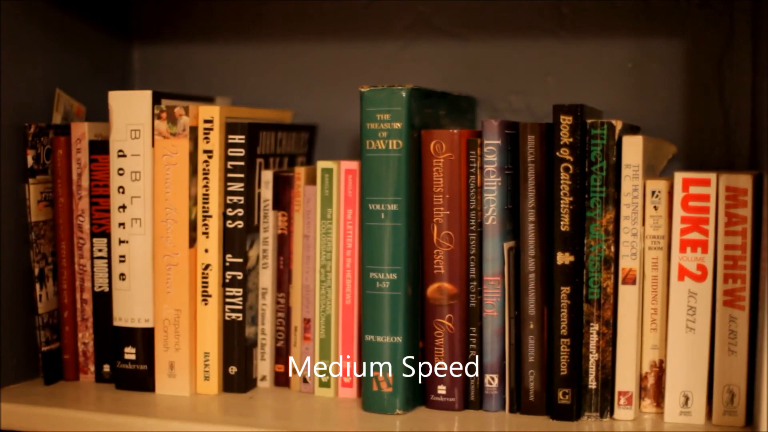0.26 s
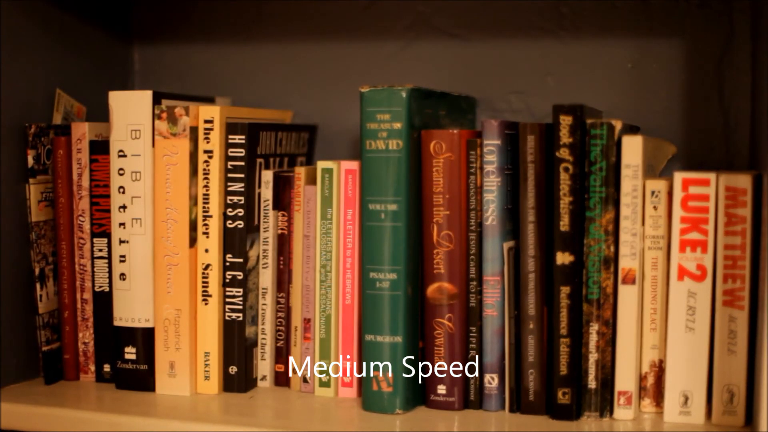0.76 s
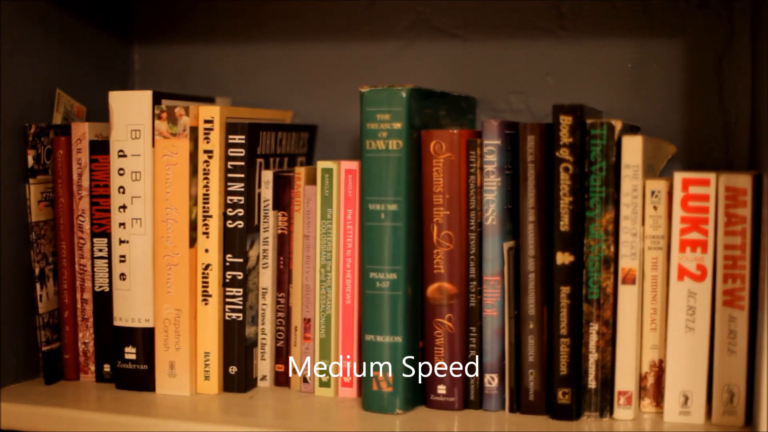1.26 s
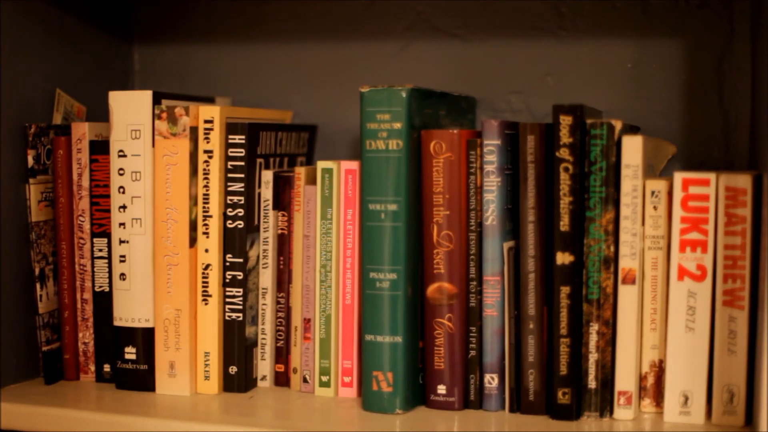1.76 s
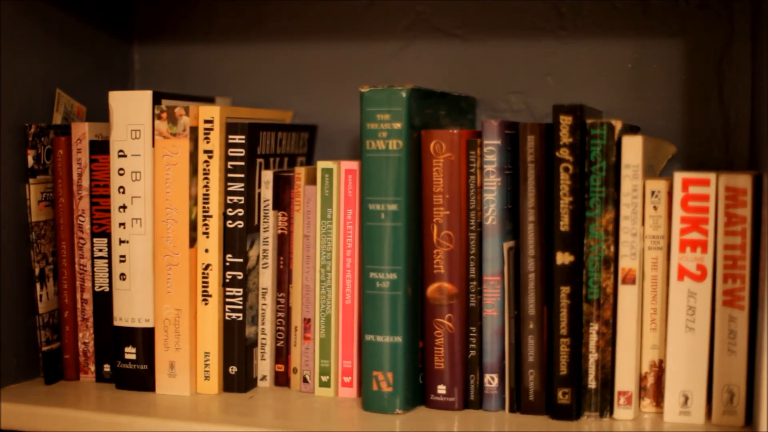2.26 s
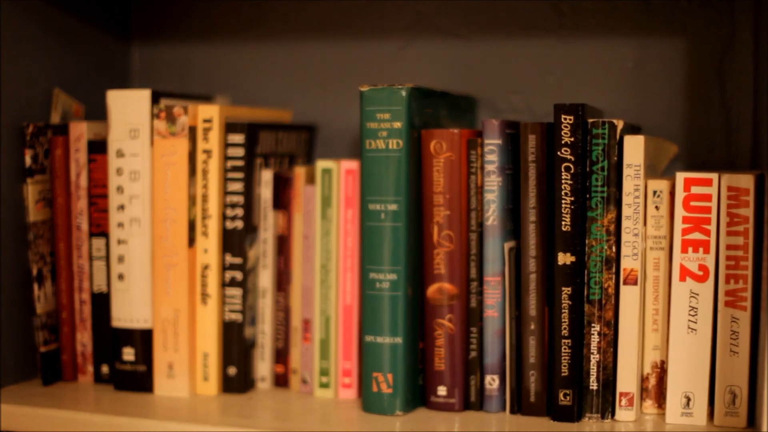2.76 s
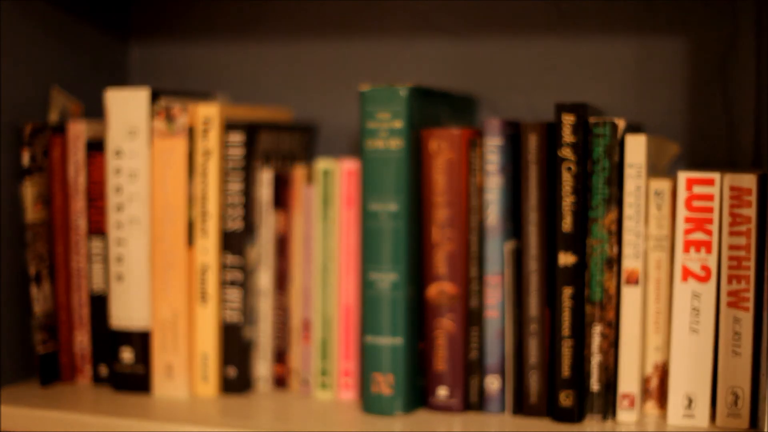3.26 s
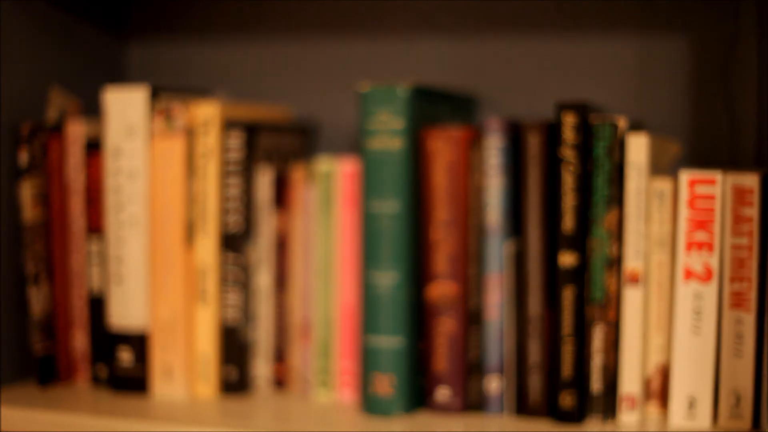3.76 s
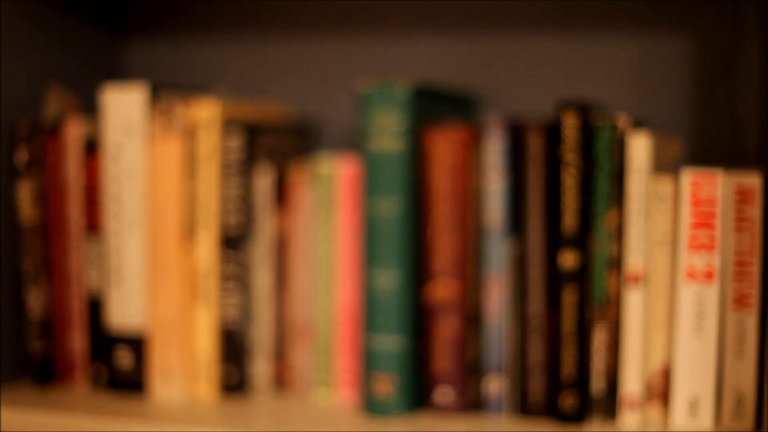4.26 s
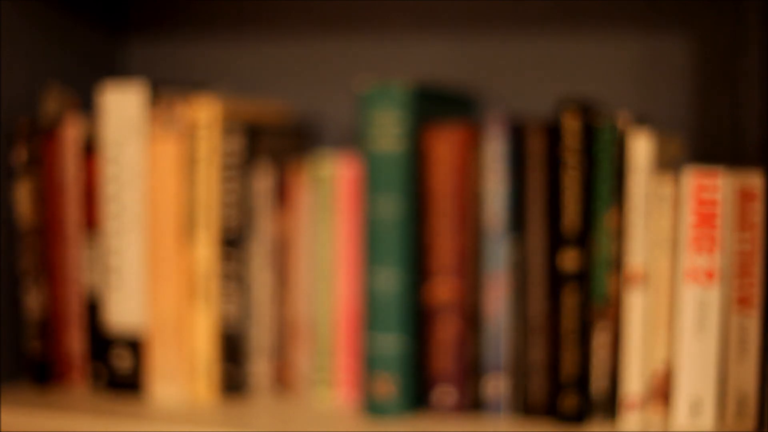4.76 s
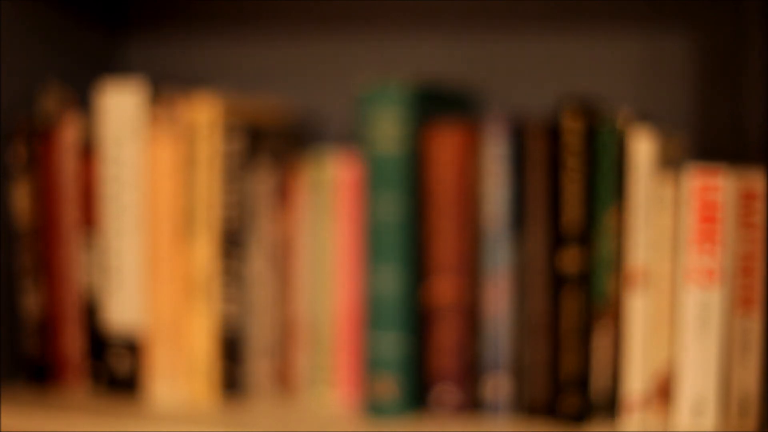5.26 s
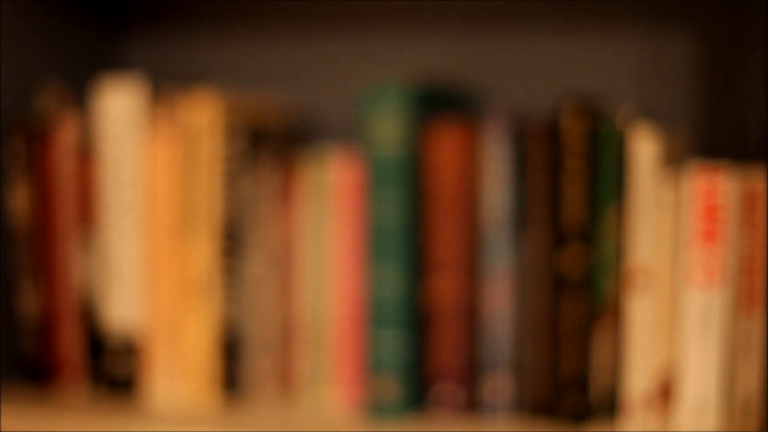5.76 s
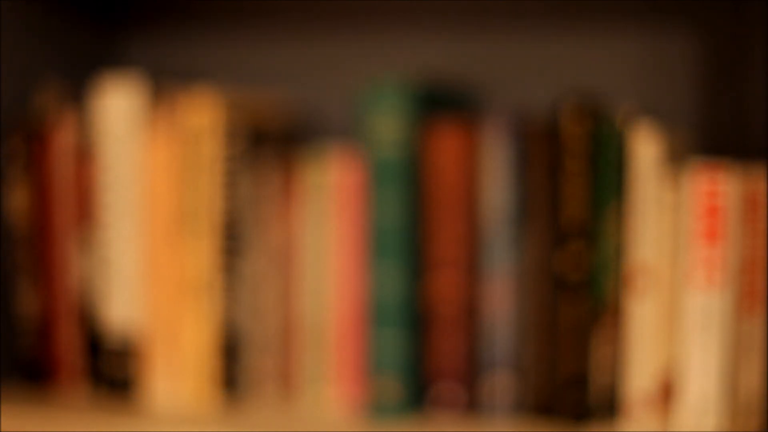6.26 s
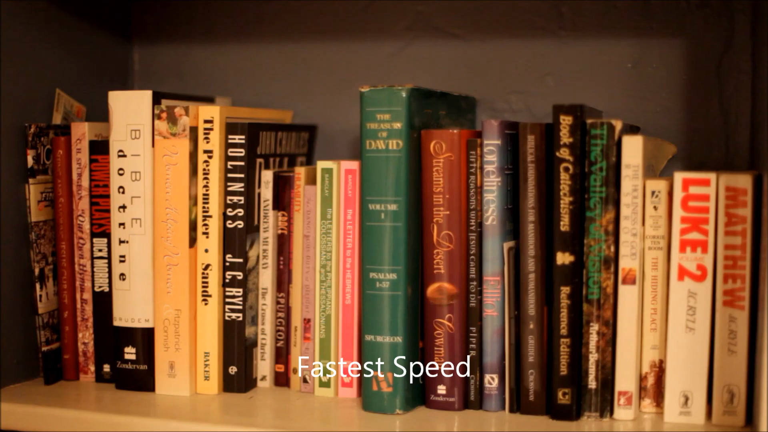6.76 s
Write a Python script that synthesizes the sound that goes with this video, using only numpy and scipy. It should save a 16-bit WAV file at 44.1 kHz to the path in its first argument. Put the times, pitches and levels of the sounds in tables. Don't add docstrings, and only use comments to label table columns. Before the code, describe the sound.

Very close in a quiet room, a camera's focus motor makes three quick clacks, then stops. Soft hiss remains while a sleeve swishes by. A small button clicks and gears rattle into mesh, then the motor steps evenly about ten times a second, each step a tiny tick, short whirr and hard clack. The stepping ends, hiss lingers, and sound drops to silence.

```python
import sys
import numpy as np
from scipy import signal
from scipy.fft import rfft, irfft
from scipy.io import wavfile
from scipy.ndimage import uniform_filter1d

SR = 44100
rng = np.random.default_rng(int(sys.argv[2]) if len(sys.argv) > 2 else 0)


def transcribe(u):
    v = np.clip(np.atleast_2d(u).T, -1, 1)
    q = np.round(v * 32767).astype(np.int16)
    wavfile.write(sys.argv[1], SR, q)


def boost_factor(decibels):
    exponent = np.asarray(decibels, float) / 20
    return 10 ** exponent


N = 308700
LEAD = 4410
TIME = np.arange(-LEAD, N) / SR

# [start t/s, motor runs/ms, slack closes after/ms, start tick level/dB, stop clack level/dB]
LAST_RUN = [
    (0.0616, 34.2, 7.38, -41, -25.5),
    (0.1461, 32.8, 9.3, -38, -29),
    (0.2684, 35.3, 14.6, -39.5, -22),
]
FIRST_TURN = [(2.3022, 46.9, 1.5, -34.5, -24), (2.425, 39.6, 7.6, -45, -25.5),
              (2.5253, 36.98, 6.6, -36.5, -21), (2.6144, 39.26, 8.5, -34, -22),
              (2.7176, 41.9, 9.2, -35, -19.5), (2.8127, 41.1, 9.8, -32.5, -20.5),
              (2.909, 38.8, 9.6, -37.5, -23), (3.0199, 36.1, 6.2, -36, -26.5),
              (3.1146, 42.9, 5.1, -39.5, -24.5), (3.2236, 40.54, 5.5, -40.5, -25.5),
              (3.3126, 39.2, 6.4, -36.5, -25.5), (3.4095, 35.57, 7.1, -31.5, -30),
              (3.5198, 36.24, 7.2, -35.5, -29), (3.6148, 36.04, 7.3, -29.5, -23),
              (3.7193, 36.7, 6.8, -32.5, -20.5), (3.8132, 35.57, 9.7, -32.5, -21),
              (3.9088, 35.1, 5.9, -36, -25), (4.0198, 35.64, 8.9, -40.5, -26),
              (4.115, 34.13, 8.9, -35, -27.5), (4.219, 33.5, 10.8, -44, -27.5),
              (4.3127, 34.14, 10.8, -39.5, -23), (4.409, 32.95, 9.6, -46, -26.5)]
SECOND_TURN = [(4.5191, 36, 9.7, -36.5, -26), (4.617, 34.1, 9.9, -33.5, -23),
               (4.7194, 38.9, 8.2, -39, -20.5), (4.8165, 40.25, 8.8, -40.5, -23),
               (4.9106, 41.06, 8.17, -44.5, -23), (5.0204, 40, 12.5, -31, -20.5),
               (5.1161, 41.86, 8.3, -36.5, -27.5), (5.2167, 40.03, 6.4, -37, -25),
               (5.3165, 40.65, 6.9, -33, -20.5), (5.4119, 42.2, 8.5, -37, -22.5),
               (5.5233, 40.13, 5.5, -35.5, -24), (5.6165, 38.66, 11.9, -35, -24.5),
               (5.7164, 35.2, 8.3, -39.5, -23), (5.8162, 34.75, 7.2, -44.5, -21.5),
               (5.9095, 36, 7.2, -38, -23.5), (6.0231, 35.1, 7.1, -36, -20.5)]
STEPS = LAST_RUN + FIRST_TURN + SECOND_TURN
# [t/s, level/dB at each colour pitch (4 columns), brake level/dB]
EARLIER_STOP = [-.014, -27, -28, -33, -36, -72]
# [f/Hz], for clack, thud, presence and snap
COLOUR_HZ = [1850, 900, 3800, 9500]
# [t/s, ring f/Hz, snap level/dB, thud level/dB, jolt to the mount level/dB]
SEATING = [(0, 1720, -32, -23, -34), (.3, 1830, -29.5, -27.5, -37), (2.35, 2010, -27, -23.5, -39.5),
           (2.8, 1850, -21.5, -26.5, -37.5), (3.05, 1856, -23.5, -29, -37), (3.16, 1850, -19, -32.5, -39),
           (3.35, 1750, -22.5, -26.5, -36), (3.46, 1740, -31.5, -29, -39.5),
           (3.75, 1710, -29, -30.5, -36.5), (4.1, 1654, -26.5, -28.5, -37.5),
           (4.42, 1640, -28.5, -25, -36.5), (4.56, 2120, -27, -24.5, -40), (5.0, 1894, -22.5, -26, -40),
           (5.35, 1825, -19, -29, -41.5), (5.66, 1700, -23, -28, -36.5), (5.93, 1670, -28.5, -29.5, -39),
           (6.1, 1710, -29.5, -29, -38)]
# [f/Hz, level/dB against the blow, time to fall 60 dB/s]
BARREL = [(550, -7.5, 0.016), (766, -3, 0.055), (881, -7.5, 0.056), (1007.5, -5.5, 0.076),
          (1097, -12.5, 0.056), (1239, -8, 0.055), (1420, -6.5, 0.055), (1622, -2.5, 0.026),
          (1710, -5, 0.038), (1868, -9.5, 0.0636), (2019, -2, 0.033), (2085, -3, .03), (2266, -6, 0.055),
          (2660, -6, 0.025), (3060, -3.5, 0.015), (3344, -17.5, 0.051), (3860, -6, 0.017),
          (5456, -13, 0.017), (5903, -13.5, 0.028), (7280, -15.5, 0.018), (8960, -11, 0.012),
          (10020, -1.5, 0.0065), (10094, -6, 0.003), (11000, -27, .004)]
# [f/Hz at ring pitch 1800 Hz, shift/Hz per Hz of ring pitch]
LOW_GROUP = (853, 0.42)
MIDDLE_GROUP = (1900, 0.51)
# [f/Hz, level/dB]
SLACK_SPECTRUM = [(550, 4), (900, -44), (1700, 0.5), (2100, 3.5), (3300, -11), (6000, -7.5), (14000, -16.5)]
WHIRR_SPECTRUM = [(550, -22), (900, -1.5), (1700, 5.5), (2100, 3), (3300, -3), (6000, 5), (14000, -32)]
# [from t/s, to t/s, whirr level/dB, hiss level/dB]
ENGAGE = (2.217, 2.303, -42, -53)
# [f/Hz, level/dB, time to fall 60 dB/s]
CARRIER = [(526, -17, 0.052), (3317, -10.5, 0.023), (5190, -17, 0.019), (6700, -14.5, .015)]
# [f/Hz, level/dB from a stop, level/dB from closing slack, time to fall 60 dB/s]
MOUNT = [(96.8, -23.5, -6, 0.067), (177.7, -7.5, -10, 0.019), (268, 4.5, -37, 0.02),
         (369.6, -18, -30.5, 0.2)]
# [f/Hz, level/dB, time to fall 60 dB/s]
BEATING = [(262, -14, .18), (282, -17, .55), (297, -14, .65), (328, -16, .18)]
# [t/s, level/dB]
BRAKE = [(0, -65.5), (2.6, -71), (2.8, -58.5), (3.35, -66.5), (3.55, -70), (4.05, -76), (4.15, -60),
         (4.45, -71), (4.7, -81), (5.15, -61), (5.4, -78.5), (6.1, -74.5)]
# [t/s, level/dB, body/dB and top/dB against that level, own ring f/Hz]
KNOCKS = [
    (2.2167, -43, -2.5, 12, 9260),
    (2.2215, -45.5, 12, 3, 2100),
    (2.2318, -31, -2, -4, 5500),
    (2.237, -32.5, -4, -2, 5530),
    (2.254, -40.5, 6, -1, 815),
    (2.2674, -22.5, -12, -10.5, 2610),
    (2.2735, -32, -8, -10, 2660),
    (2.2809, -38, 9, -14, 2300),
    (2.3028, -32.5, 1, -6, 2680),
    (2.3125, -40.5, 10, 5, 2000),
]
# [fastest t/s, level/dB, rise/dB per s squared, fall/dB per s squared, centre f/Hz]
SLEEVE = [
    (0.751, -47, 2200, 1400, 3980),
    (1.1, -56, 394, 152, 4730),
    (1.44, -71, 2500, 894, 4200),
    (2.17, -64.5, 1500, 1499, 5000),
    (3.17, -60, 900.5, 903, 6490),
    (4.3, -60, 151, 202, 6490),
]
# [low f/Hz, high f/Hz]
SHELL_HZ = (240, 400)
# [t/s, level/dB]
FINGER = [
    (2.08, -73),
    (2.098, -94),
    (2.128, -53),
    (2.206, -56),
    (2.21, -58.5),
]
# [f/Hz, level/dB]
HISS = [(15, -33.5), (25, -7), (124, 0), (220, -1), (238, -0.5), (410, -3), (584, -4.5), (1930, -8),
        (5130, -10.5), (5720, -10), (6550, -10), (15700, -19), (16000, -45.5)]
# [f/Hz, level/dB]
WHINES = [(118.4, -76), (5609, -71)]


def rms_one(x):
    return x / np.sqrt(np.mean(x ** 2) + 1e-20)


def noise():
    return rng.standard_normal(len(TIME))


def span(t0, t1):
    return slice(round(t0 * SR) + LEAD, round(t1 * SR) + LEAD)


def at_hz(points, hz):
    points = np.array(sorted(points))
    return np.interp(np.log(hz), np.log(points[:, 0]), points[:, 1])


def clicks(times, sizes):
    out = np.zeros(len(TIME))
    np.add.at(out, np.round(np.asarray(times) * SR).astype(int) + LEAD, sizes)
    return out


def dying(x, t60):
    return signal.lfilter([1], [1, -boost_factor(-60 / (t60 * SR))], x + 1e-18)


def ring(drive, hz, t60):
    r, w = boost_factor(-60 / (t60 * SR)), 2 * np.pi * hz / SR
    return signal.lfilter([0, np.sin(w)], [1, -2 * r * np.cos(w), r * r], drive + 1e-18)


def band(x, low_hz, high_hz):
    return signal.sosfilt(signal.butter(2, [low_hz, high_hz], "band", fs=SR, output="sos"), x)


def soft_contact(x):
    return signal.sosfilt(signal.butter(2, 500, fs=SR, output="sos"), x)


def seating(times):
    s, *columns = np.transpose(SEATING)
    return [np.interp(times, s, c) for c in columns]


def starts():
    s, _, slack_ms, tick_db, _ = np.transpose(STEPS)
    take_up_db = -30 - 0.11 * (tick_db + 36.5)
    return np.transpose([s, tick_db, slack_ms, take_up_db]).tolist()


def stops():
    s, run_ms, _, _, clack_db = np.transpose(STEPS)
    s = s + run_ms / 1000
    _, snap_db, thud_db, _ = seating(s)
    presence_db = -30.5 + 0.68 * (snap_db + 25)
    brake_db = np.interp(s, *np.transpose(BRAKE))
    return np.transpose([s, clack_db, thud_db, presence_db, snap_db, brake_db]).tolist()


def favour_db(times, hz, sharp_db=107.0, most_db=6.0):
    centre_hz, follows = LOW_GROUP if hz < 1180 else MIDDLE_GROUP
    centre = centre_hz + follows * (seating(times)[0] - 1800)
    return -np.minimum(sharp_db * np.log2(hz / centre) ** 2, most_db) * (650 < hz < 2400)


def clacks(rows, spread_db, flip, rise_s, crack_db, damped, top_hz):
    rows = np.array(rows)
    times = rows[:, 0]
    chance = rng.standard_normal((len(rows), len(BARREL)))
    signs = np.where(rng.random((len(rows), len(BARREL))) < flip, -1, 1)
    out = np.zeros(len(TIME))
    for k, (hz, level_db, t60) in enumerate(BARREL):
        blow_db = np.array([at_hz(zip(COLOUR_HZ, row[1:5]), hz) for row in rows]) + favour_db(times, hz)
        sizes = boost_factor(blow_db + level_db + spread_db * chance[:, k]) * signs[:, k] * (-1) ** k
        swell = rise_s * (hz / 2000) ** -.6
        push = ring(clicks(times, sizes), hz, swell * np.log(1000))
        out += ring(push, hz, t60 * damped) * 2 / (swell * SR)
    for column, low_hz, high_hz, t60 in ((3, 1600, 5700, 0.033), (4, 5800, top_hz, 0.007)):
        envelope = dying(clicks(times, boost_factor(rows[:, column] + crack_db)), t60)
        out += envelope * rms_one(band(noise(), low_hz, high_hz))
    return out


def stop_clacks():
    return clacks(stops() + [EARLIER_STOP], spread_db=2.0, flip=.02, rise_s=0.00029, crack_db=-7.5,
                  damped=0.83, top_hz=15500)


def afterglow():
    rows = np.array(stops() + [EARLIER_STOP])
    return dying(clicks(rows[:, 0], boost_factor(rows[:, 2] - 22.0)), 0.16) * rms_one(band(noise(), 400, 2400))


def start_ticks():
    s, tick_db, _, _ = np.transpose(starts())
    snap = dying(clicks(s, boost_factor(tick_db)), 0.0095)
    bright = band(band(noise(), 5400, 17000), 5500, 13000)
    return snap * rms_one(bright) + ring(clicks(s, boost_factor(tick_db + 0.5)), 9400, 0.0064)


def motor():
    slack, turning, hiss = np.zeros((3, len(TIME)))
    levels_db = np.array([-44.5, -54.5]) + 1.55 * rng.standard_normal((len(STEPS), 2))
    for (start, _, lag_ms, take_db), stop, (whirr_db, hiss_db) in zip(starts(), stops(), levels_db):
        running = span(start, stop[0])
        since = TIME[running] - start - lag_ms / 1000
        growing = np.exp(np.minimum(since, 0) / 0.0027)
        fading = np.exp(-np.maximum(since, 0) / 0.00081)
        slack[running] = boost_factor(take_db) * np.where(since < 0, growing, fading)
        turning[running], hiss[running] = boost_factor(whirr_db), boost_factor(hiss_db)
    from_s, to_s, whirr_db, hiss_db = ENGAGE
    meshing = span(from_s, to_s)
    turning[meshing], hiss[meshing] = boost_factor(whirr_db), boost_factor(hiss_db)
    uneven = boost_factor(1.6 * np.minimum(rng.exponential(1, len(TIME)), 4))
    teeth = rms_one(rng.standard_normal((2, len(TIME))) * uneven)
    out = hiss * boost_factor(-2) * rms_one(band(teeth[0], 5000, 9230))
    out += turning * boost_factor(-15.5) * rms_one(band(teeth[1], 80, 800))
    for k, (hz, level_db, t60) in enumerate(BARREL):
        drive = slack * boost_factor(at_hz(SLACK_SPECTRUM, hz) - 13) + turning * boost_factor(at_hz(WHIRR_SPECTRUM, hz) - 10.5)
        even_out = np.sqrt(30 / (t60 * SR))
        out += boost_factor(level_db) * ring(drive * teeth[k % 2], hz, t60 * 0.59) * even_out
    return out


def take_up():
    rows = []
    for start, _, lag_ms, take_db in starts():
        for share, touch_db in ((.45, -4.5), (.8, -4)):
            blow_db = take_db + touch_db
            rows.append((start + share * lag_ms / 1000, blow_db, blow_db - 17.0, blow_db - 9.5, blow_db - 14.0))
    out = clacks(rows, spread_db=2.0, flip=0.31, rise_s=0.0027, crack_db=-17.5, damped=0.512, top_hz=10850)
    times, blows_db = np.transpose(rows)[:2]
    chance = rng.standard_normal((len(rows), len(CARRIER)))
    for k, (hz, db, t60) in enumerate(CARRIER):
        out += ring(clicks(times, boost_factor(blows_db + db + 4.1 * chance[:, k])), hz, t60)
    since = np.arange(1500) / SR
    for at, blow_db, detune in zip(times, blows_db, rng.standard_normal(len(rows))):
        hz = seating(at)[0] * (1 + 0.038 * detune)
        envelope = boost_factor(blow_db + 2.0 - 60 * since / 0.03) * (1 - np.exp(-since / 0.001))
        i = round(at * SR) + LEAD
        out[i:i + len(since)] += envelope * np.sin(2 * np.pi * hz * since)
    return out


def mount():
    halts = EARLIER_STOP[:1] + [row[0] for row in stops() + KNOCKS[5::3]]
    times = np.array(halts + [row[0] + row[2] / 1000 for row in starts()])
    jolt_db, stopping = seating(times)[3], np.arange(len(times)) < len(halts)
    chance = rng.standard_normal((len(times), len(MOUNT)))
    out = np.zeros(len(TIME))
    for k, (hz, stop_db, nudge_db, t60) in enumerate(MOUNT):
        blow_db = jolt_db + np.where(stopping, stop_db, nudge_db) + 1.5 * chance[:, k]
        out += ring(clicks(times, boost_factor(blow_db)), hz, t60)
    return soft_contact(out)


def lens_group():
    out, since = np.zeros(len(TIME) + SR), np.arange(SR // 2) / SR
    halts = np.array(EARLIER_STOP[:1] + [row[0] for row in stops()])
    grips = [row[0] for row in starts()] + [99]
    chance = rng.standard_normal((len(halts), len(BEATING)))
    for halt, grip, jolt_db, uneven in zip(halts, grips, seating(halts)[3], chance):
        hum = np.zeros(len(since))
        for (hz, db, t60), e in zip(BEATING, uneven):
            hum += boost_factor(db + 1.8 * e - 60 * since / t60) * np.sin(2 * np.pi * hz * since)
        gripped_s = np.maximum(since - (grip - halt), 0)
        i = round(halt * SR) + LEAD
        out[i:i + len(since)] += hum * boost_factor(jolt_db + 1 - 60 * gripped_s / .06)
    return soft_contact(out[:len(TIME)])


def brake():
    held = np.zeros(len(TIME))
    for row in stops():
        now = span(row[0], row[0] + .03)
        held[now] = boost_factor(row[5] - 200 * (TIME[now] - row[0] - 0.0375))
    return held * np.sin(2 * np.pi * 9550 * TIME)


def button():
    snaps = sum(ring(clicks([s], boost_factor(db + 2.0)), hz, 0.02) for s, db, *_, hz in KNOCKS)
    rows = [(s, db + body_db, db + body_db, db, db + top_db) for s, db, body_db, top_db, _ in KNOCKS]
    return snaps + clacks(rows, spread_db=0.0, flip=.3, rise_s=0.00019, crack_db=-9.5,
                          damped=0.48, top_hz=10500)


def sleeve():
    strokes, pitches = [], []
    for s, db, rise, fall, hz in SLEEVE:
        since = TIME - s
        strokes.append(boost_factor(db - np.where(since < 0, rise, fall) * since ** 2) + 1e-9)
        pitches.append(hz + 6700 * np.clip(since, -.2, .2))
    strokes, pitches = np.array(strokes), np.array(pitches)
    level = strokes.sum(axis=0)
    centre = np.log2((strokes * pitches).sum(axis=0) / level)
    grains = rng.standard_normal((2, len(TIME))) * boost_factor(1.7 * rng.exponential(1, len(TIME)))
    edges = np.geomspace(500, 9500, 8)
    rub = np.zeros(len(TIME))
    for k in range(7):
        octaves_off = np.log2(edges[k] * 1.67) - centre
        rub += band(grains[k % 2], edges[k], edges[k + 1]) * boost_factor(-1.5 * octaves_off ** 2)
    lumps = boost_factor(-16 + 2.5 * rms_one(uniform_filter1d(noise(), size=1200)))
    shell = np.sqrt(level * level.max()) * lumps * rms_one(band(grains[0], *SHELL_HZ))
    return shell + level * rub / np.sqrt(uniform_filter1d(rub ** 2, size=4000))


def finger():
    s, level_db = np.transpose(FINGER)
    return boost_factor(np.interp(TIME, s, level_db, left=-99, right=-99)) * rms_one(band(noise(), 60, 1500))


def floor():
    steps = uniform_filter1d(rng.standard_normal((2, len(TIME))), size=3000)
    wander = steps.cumsum(axis=1) * .03
    tones = np.zeros(len(TIME))
    for (hz, db), phase in zip(WHINES, wander):
        tones += boost_factor(db + 2.0) * np.sin(2 * np.pi * hz * TIME + phase)
    hz = np.maximum(np.fft.rfftfreq(len(TIME), 1 / SR), 1)
    hiss = irfft(rfft(noise()) * boost_factor(at_hz(HISS, hz)), len(TIME))
    return boost_factor(-59) * rms_one(hiss) + tones


def scene():
    body = stop_clacks() + afterglow() + start_ticks() + motor() + take_up() + mount() + lens_group() + button()
    body = band(body, 86, 12000)
    return (body + brake() + sleeve() + finger() + floor())[None, LEAD:]


def band_limit(x):
    return signal.sosfilt(signal.butter(12, 16810, fs=SR, output="sos"), x)


def record(dry):
    drop_s, end_s = 6.648, 6.688
    fade_s = [drop_s, drop_s + 0.0063, end_s, end_s + .002]
    fade_db = np.interp(TIME[LEAD:], fade_s, [0, -25, -40, -200])
    dry = signal.sosfilt(signal.cheby2(16, 60, 17100, fs=SR, output="sos"), dry)
    return band_limit(dry * boost_factor(fade_db))


dry = scene()
out = record(dry)
transcribe(out)
```